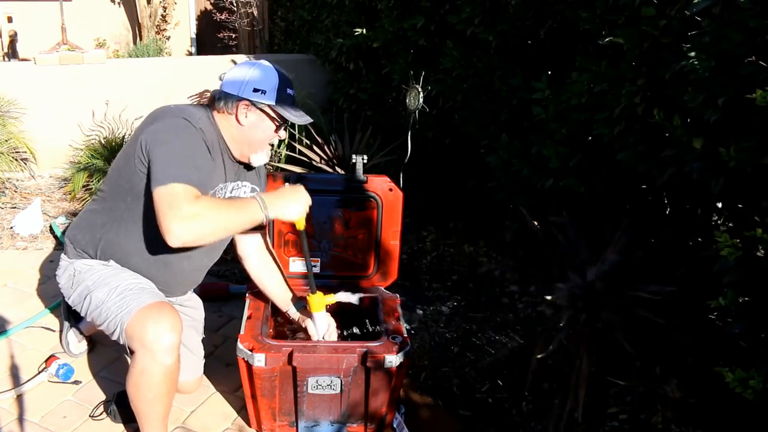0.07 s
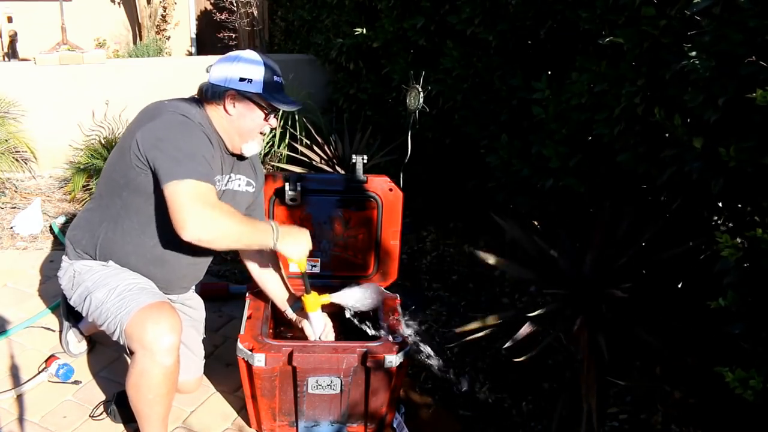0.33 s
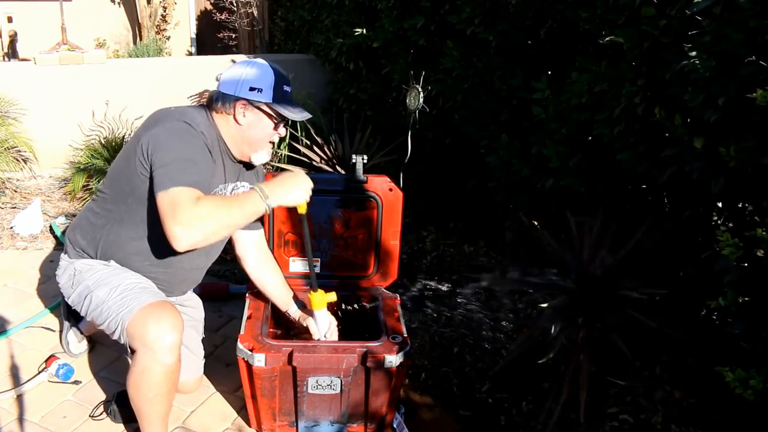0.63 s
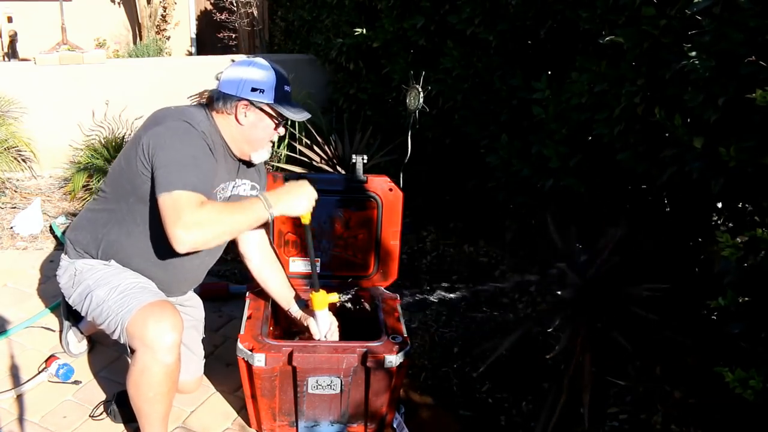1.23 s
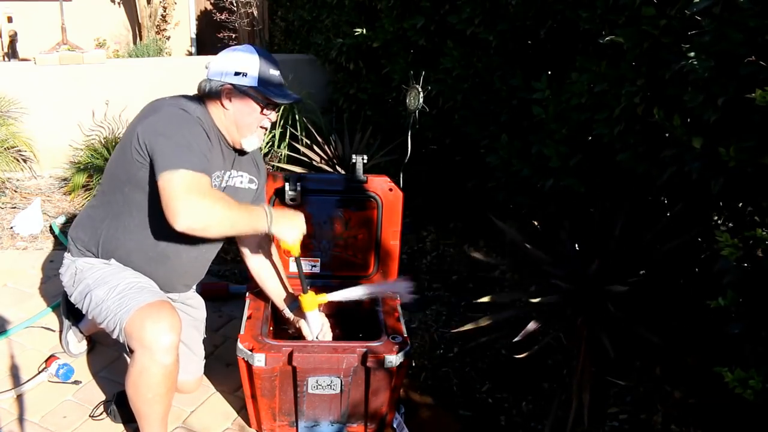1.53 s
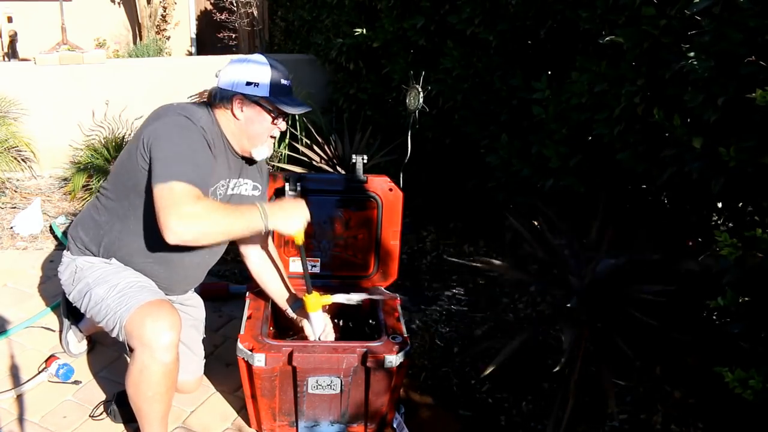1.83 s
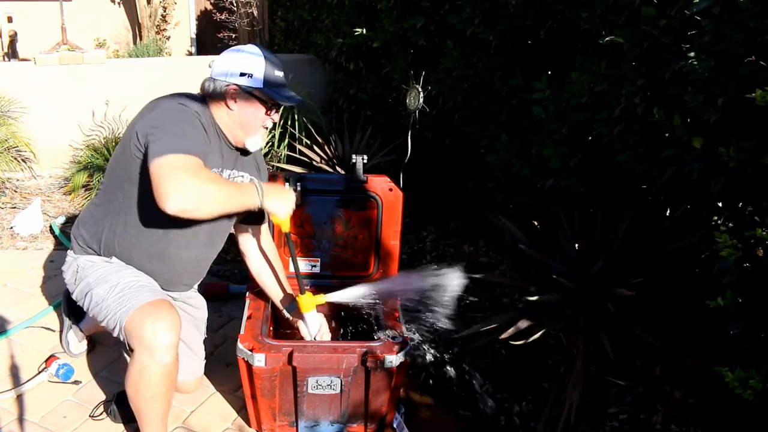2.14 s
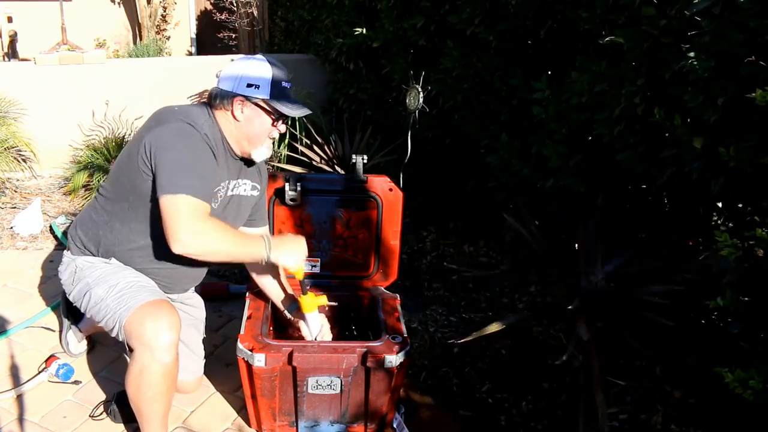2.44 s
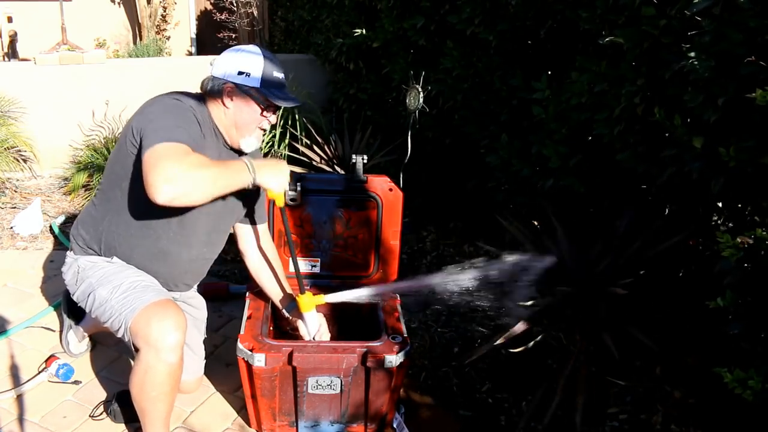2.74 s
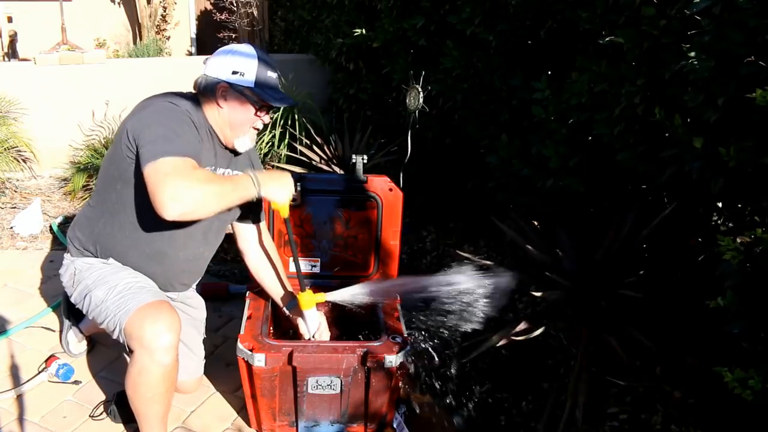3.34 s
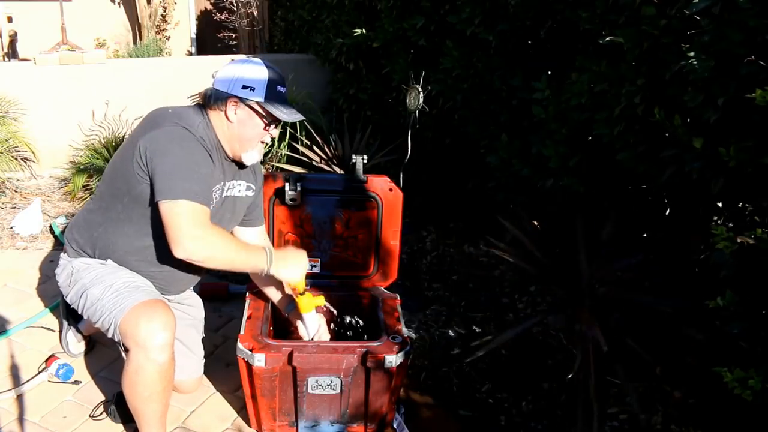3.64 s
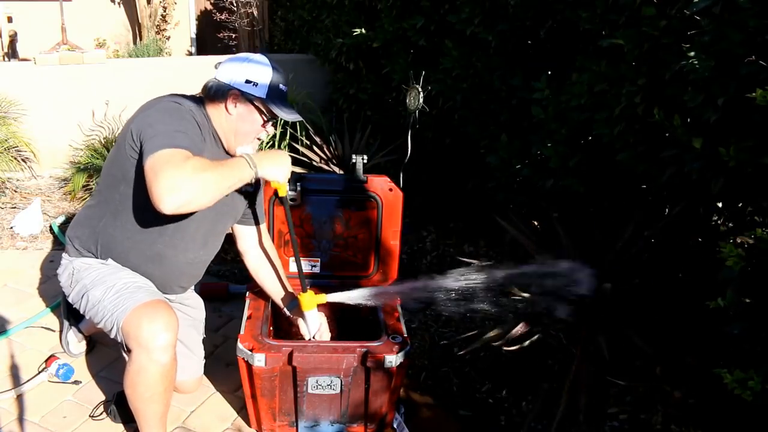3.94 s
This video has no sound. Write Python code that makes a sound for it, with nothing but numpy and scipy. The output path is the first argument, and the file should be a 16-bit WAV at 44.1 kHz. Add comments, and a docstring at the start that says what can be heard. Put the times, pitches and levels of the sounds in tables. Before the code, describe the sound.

In a yard, a hand water pump clacks about seven times in an even rhythm. Between the clacks come short squirts, gulps, dull knocks and drops spattering into bushes, with a constant background hiss.

```python
"""In a yard, a plastic hand bilge pump is worked in a cooler of water, about one stroke every 0.58 s.
At the bottom the piston's impact excites the modes of pump, rod, water column and cooler. On the pull
the valve chirps and a bubbling jet leaves the spout. At the top the barrel knocks, air pockets resonate
in gulps and glugs, and air sometimes spits out. Spray patters into the bushes over a steady hiss."""
import sys
import numpy as np
from scipy import signal
from scipy.fft import rfft, irfft
from scipy.io import wavfile
from scipy.ndimage import uniform_filter1d, map_coordinates

SR = 44100
rng = np.random.default_rng(int(sys.argv[2]) if len(sys.argv) > 2 else 0)


def wav_out(sig):
    """Save sig, one row per channel (or a flat mono array), as 16-bit PCM at SR to the path in sys.argv[1]."""
    wavfile.write(sys.argv[1], SR, np.round(np.clip(np.atleast_2d(sig).T, -1, 1) * 32767).astype(np.int16))


N = 176400


# Piston impacts: t/s, body level/dB, crack level/dB, ping f/Hz, water column level/dB, rod re body/dB
CLACKS = [(0.2881, -1.5, -0.5, 6100, -24, 0.5), (0.881, 3.5, 0.5, 5420, -22.5, 3.5),
          (1.4469, 6, 1, 5630, -18, 4), (2.024, 1.5, -3.5, 5630, -17.5, 0),
          (2.5723, 5.5, -0.5, 6160, -16.5, -7), (3.202, 1, -4.5, 5570, -17, -2),
          (3.75, 8, 1.5, 5370, -21, -3)]
# Modes of the pump with the piston down: f/Hz, level/dB, T60/s
PUMP_MODES = [(163.8, -38, 0.44), (356, -23, 0.15), (417, -18.5, 0.078), (501, -23, 0.13),
              (558, -18, 0.074), (695, -17, 0.11), (751, -9, 0.064), (860, -9, 0.042), (933, -20.5, 0.1),
              (1039, -16, 0.074)]
# Modes of the rod and handle: f/Hz, level/dB, T60/s
ROD_MODES = [(1355, -17, 0.056), (1577, -10, 0.027), (1724, -13.5, 0.061), (2270, -7, 0.012)]
# Spectrum of the plastic crack: f/Hz, level/dB
CRACK_SPECTRUM = [(100, -31.5), (700, 2.5), (1800, 4), (3800, -5.5), (5500, -1), (8000, 1), (11000, -13.5),
                  (16000, -23)]
COLUMN_HZ, COLUMN_T60_S = 252, 0.27

def piston_clacks():
    """Impact excitation: the piston bottoms out with a crack; pump, rod, water and cooler ring freely."""
    out, t = np.zeros(N), np.arange(SR // 3) / SR
    for s, body_db, crack_db, hz, column_db, rod_db in CLACKS:
        crack = amp(-4) * decay(t, t60=0.019, hold=0.0021) * noise(CRACK_SPECTRUM, len(t))
        ping = amp(-4.5) * decay(t, t60=0.021) * np.sin(2 * np.pi * hz * t)
        column = amp(column_db) * decay(t, COLUMN_T60_S) * np.sin(2 * np.pi * COLUMN_HZ * t)
        pump = ring(PUMP_MODES, t, scatter_db=1, detune=0.004)
        rod = amp(rod_db) * ring(ROD_MODES, t, scatter_db=1.5, detune=0.01)
        body = pump + rod + amp(-16) * cooler(t)
        add(out, s, column + amp(body_db) * body + amp(crack_db) * (crack + ping))
    return out


# Knocks at the top of the stroke: t/s, level/dB
KNOCKS = [(.003, -8), (0.04, -13.5), (0.602, -10), (0.618, -12.5), (1.26, -14.5), (1.759, -2.5),
          (1.798, -10), (2.324, -5), (2.357, -7), (2.881, -6.5), (2.918, -8)]
# Modes of the barrel with the piston up: f/Hz, level/dB, T60/s
BARREL_MODES = [(191.4, -25, 0.34), (368, -10.5, 0.06), (577, -17, 0.1), (743, -13.5, 0.048)]
# Spectrum of water in the pump, for slaps and gulps: f/Hz, level/dB
WET_SPECTRUM = [(60, -2), (200, -4), (450, -12), (800, -2), (1100, -5.5), (1600, -1.5), (2200, -8.5),
                (2900, -5), (4500, -21), (8000, -11.5), (16000, -37)]

def barrel_knocks():
    """Cushioned impact: water softens the piston's turn, so the barrel rings with a soft, wet onset."""
    out, t = np.zeros(N), np.arange(SR // 3) / SR
    for s, db in KNOCKS:
        slap = amp(-4.5) * decay(t, t60=0.021) * noise(WET_SPECTRUM, len(t))
        barrel = ring(BARREL_MODES, t, scatter_db=0, detune=0.015)
        add(out, s, amp(db) * onset(t, rise=0.004) * (barrel + slap + amp(-13) * cooler(t)))
    return out


# Response of the cooler to a blow: f/Hz, level/dB
COOLER_SPECTRUM = [(60, -14), (160, -2), (280, -4.5), (420, -1), (800, -2), (1200, -12), (3000, -35)]

def cooler(t):
    """Modal overlap: the hollow cooler's dense resonances merge into decaying noise."""
    return decay(t, t60=0.13) * noise(COOLER_SPECTRUM, len(t))


# One jet a pull: start t/s, end t/s, squirt level/dB, fizz level/dB, spout note level/dB
JETS = [(0.394, 0.559, -34, -29.5, -26.5), (0.98, 1.153, -25, -29.5, -27.5),
        (1.558, 1.743, -24, -29.5, -29), (2.112, 2.296, -30.5, -29, -33), (2.669, 2.859, -24.5, -31, -28),
        (3.308, 3.469, -26, -28.5, -27), (3.836, 4.014, -22.5, -30, -26.5)]
# Spectrum of the jet at mid-pull: f/Hz, level/dB
JET_SPECTRUM = [(80, -45), (200, -9.5), (350, 0.5), (560, -4), (760, -3.5), (900, -3), (1080, 1.5),
                (1250, 1.5), (1600, 4), (2200, 3.5), (2700, -3), (3200, -1), (4200, -41), (16000, -50)]
# Resonances of the water column above the piston at mid-pull: f/Hz, level/dB
COLUMN_SPECTRUM = [(400, -51), (950, 1.5), (1250, -6), (1650, 0.5), (2100, -4.5), (6000, -48)]
# Spectrum of the fine bubbles at mid-pull: f/Hz, level/dB
FIZZ_SPECTRUM = [(100, -38), (1200, -13), (2400, -1), (3300, 5), (4700, 0), (6500, 1), (9000, -7.5),
                 (16000, -11)]
SPOUT_HZ, SPOUT_SKIRT_HZ = 765, 202

def jets():
    """Pipe resonance: a bubbling jet climbs in pitch as the column shortens; the spout holds one note."""
    flutter = amp(1.6 * wobble(70))
    jet = flutter * water(JET_SPECTRUM, (465, 3840), cycles=3.7, spread_db=0, noise_db=-1, count=6000)
    column = water(COLUMN_SPECTRUM, (850, 2200), cycles=5, spread_db=3, noise_db=-7, count=2500)
    column *= flutter
    fizz = water(FIZZ_SPECTRUM, (2170, 13900), cycles=8.2, spread_db=-5.5, noise_db=-5, count=7000)
    note = noise([(SPOUT_HZ / 2, -60), (SPOUT_HZ - SPOUT_SKIRT_HZ, -22), (SPOUT_HZ, 0),
                  (SPOUT_HZ + SPOUT_SKIRT_HZ, -22), (SPOUT_HZ * 2, -60)])
    out = np.zeros(N)
    for start, end, db, fizz_db, note_db in JETS:
        middle = (start + end) / 2
        squirt = amp(2.5) * glide(jet, middle, octaves_per_s=1.4, reach=0.07)
        squirt += amp(-1.5) * glide(column, middle, octaves_per_s=7, reach=0.06)
        rising_fizz = glide(fizz, middle, octaves_per_s=5, reach=0.07)
        out += amp(db) * swell(start, end, rise=0.052, t60=0.1) * squirt
        out += amp(fizz_db) * swell(start, end, rise=0.06, t60=0.26) * rising_fizz
        out += amp(note_db) * swell(start, end - 0.045, rise=0.052, t60=0.1) * note
    return out


# Escapes of air: t/s, duration/s, level/dB, rise time/s
SPITS = [(2.439, 0.031, -2, 0.0054), (3.491, 0.051, -6, 0.035)]
# Spectrum of a spit: f/Hz, level/dB
SPIT_SPECTRUM = [(40, -12), (170, -7), (300, -11), (900, -10.5), (2000, -10.5), (4500, -13), (6500, -16.5),
                 (9500, -17.5), (16000, -21.5)]
SPIT_HOLD_SHARE, SPIT_FADE_DB = 0.42, 12

def air_spits():
    """Turbulent flow: air bursts out as the jet runs dry, and fades until the valve cuts it off."""
    spit = water(SPIT_SPECTRUM, (520, 12400), cycles=0.38, spread_db=2.5, noise_db=-3, count=8000)
    out = np.zeros(N)
    for s, length, db, rise in SPITS:
        progress = (clock() - s) / length
        fade = np.clip((progress - SPIT_HOLD_SHARE) / (1 - SPIT_HOLD_SHARE), 0, 1)
        out += amp(db - SPIT_FADE_DB * fade) * swell(s, s + length, rise, t60=0.018) * spit
    return out


# Valve openings: t/s, duration/s, level/dB, mid-chirp f/Hz
CHIRPS = [(.971, 0.0087, -16.5, 3120), (1.544, 0.013, -19, 3084), (2.286, 0.0039, -23, 4930),
          (2.674, 0.011, -16.5, 2900), (3.845, 0.013, -15, 2760)]
# Spectrum of the wet rasp: ratio to the chirp's f, level/dB
RASP_SPECTRUM = [(.15, -4.5), (.55, 0), (1, -1), (1.5, -13), (1.8, -26), (3.5, -40)]
CHIRP_OCTAVES_PER_S = 11

def valve_chirps():
    """Flow-induced vibration: the rubber valve opens with a rising squeak; an overtone joins late."""
    out, t = np.zeros(N), np.arange(SR // 10) / SR
    for s, length, db, hz in CHIRPS:
        pitch = hz * 2 ** (CHIRP_OCTAVES_PER_S * (np.minimum(t, 2 * length) - length / 2))
        phase = 2 * np.pi * np.cumsum(pitch) / SR + 0.8 * wobble(550)[:len(t)]
        squeak = np.sin(phase) + 0.6 * onset(t, length) ** 2 * np.sin(1.42 * phase)
        rasp = 0.6 * noise([(ratio * hz, level) for ratio, level in RASP_SPECTRUM], len(t))
        envelope = onset(t, rise=0.001) * decay(t, t60=0.016, hold=length)
        add(out, s, amp(db) * envelope * (squeak + rasp))
    return out


# Gulps in the spout: t/s, duration/s, level/dB, air pocket f/Hz
GULPS = [(0.037, 0.0032, -20, 774), (0.679, 0.015, -21, 1320), (0.694, 0.012, -21, 3240),
         (1.268, 0.026, -20, 1730), (1.5, 0.007, -40, 660), (1.794, 0.014, -17.5, 750),
         (2.394, 0.034, -16, 1700), (2.667, 0.0044, -18, 850), (2.976, 0.0032, -14.5, 2530),
         (3.574, 0.03, -24, 1590)]

def gulps():
    """Resonant filtering: a pocket of air lifts the bubbling of passing water near its own frequency."""
    bubbles = water(WET_SPECTRUM, (405, 5130), cycles=6, spread_db=1.5, noise_db=6.5, count=8000)
    out, t = np.zeros(N), np.arange(SR // 8) / SR
    for s, length, db, hz in GULPS:
        pocket_peak = [(hz / 1.38, 0), (hz, 9), (hz * 1.15, 0)]
        gulp = colour(bubbles[round(s * SR):][:len(t)], pocket_peak)
        add(out, s, amp(db) * onset(t, rise=0.0014) * decay(t, t60=0.076, hold=length) * gulp)
    return out


# Large air pockets in the barrel: t/s, level/dB, f/Hz
GLUGS = [(0.626, -19.5, 248), (1.767, -17.5, 392), (2.327, -25, 385), (2.887, -15, 406.6)]

def glugs():
    """Bubble resonance: trapped air is a spring and water its mass, giving one damped, hollow note."""
    out, t = np.zeros(N), np.arange(SR // 4) / SR
    for s, db, hz in GLUGS:
        add(out, s, amp(db) * onset(t, rise=0.0049) * decay(t, t60=0.2) * np.sin(2 * np.pi * hz * t))
    return out


# Showers landing in the bushes: start t/s, end t/s, level/dB
SHOWERS = [(-.06, 0.125, -28.5), (0.545, 0.762, -29), (1.143, 1.304, -30), (1.712, 1.908, -29),
           (2.293, 2.338, -22.5), (2.825, 3.067, -29.5), (3.584, 3.634, -27.5)]
# Spectrum of the fine drops: f/Hz, level/dB
SPRAY_SPECTRUM = [(80, -12), (280, -4.5), (500, -16), (850, 1), (1100, -5.5), (1700, 1.5), (2700, -3.5),
                  (4600, -7), (6200, -3.5), (8300, 1.5), (10000, 1), (12500, -7.5), (16000, -11)]
# Single splats on leaves: t/s, level/dB
SPLATS = [(.123, -26), (.652, -21), (1.238, -16), (1.771, -18), (1.918, -31), (2.527, -26), (2.935, -20),
          (3.043, -20), (3.168, -36), (3.371, -25.5)]
# Spectrum of the ticks and splats: f/Hz, level/dB
SPLAT_SPECTRUM = [(200, -36), (3000, -9), (6500, 0.5), (8500, 10), (11000, 1), (16000, -27)]
TICKS_PER_S, TICK_T60_S = 45, 0.008

def spray():
    """Shot noise: random impacts of fine drops on leaves merge into patter; big ones tick and splat."""
    clumps = amp(1.8 * wobble(60))
    drops = water(SPRAY_SPECTRUM, (874, 13300), cycles=0.41, spread_db=5, noise_db=4, count=11000)
    hits = (rng.random(N) < TICKS_PER_S / SR) * rng.uniform(0.3, 1, N)
    ticks = amp(12) * signal.lfilter([1], [1, -decay(1 / SR, TICK_T60_S)], hits)
    shower = sum(amp(db) * swell(start, end, rise=0.052, t60=0.61) for start, end, db in SHOWERS)
    splats = sum(amp(db) * swell(s, s + 0.0015, rise=0.0011, t60=0.036) for s, db in SPLATS)
    return shower * clumps * drops + (shower * ticks + splats) * noise(SPLAT_SPECTRUM)


# Spectrum of the outdoor background: f/Hz, level/dB
YARD_SPECTRUM = [(20, -4), (60, 4.5), (130, 0), (300, 9), (450, 4.5), (800, 3), (1300, 4), (2500, 1),
                 (5000, -5), (8500, 2.5), (12000, -5), (16000, -8.5)]

def yard():
    """Ambient noise: a broadband hiss whose level drifts a little."""
    return amp(-34.5 + 1.1 * wobble(6)) * noise(YARD_SPECTRUM)


def ring(modes, t, scatter_db, detune):
    """Modal superposition: damped sines whose levels and frequencies vary from blow to blow."""
    hz, db, t60 = np.transpose(modes)[:, :, None]
    level, shift = rng.standard_normal((2, len(modes), 1))
    sign = (-1) ** np.arange(len(modes))[:, None]
    tones = np.sin(2 * np.pi * hz * (1 + detune * shift) * t)
    return np.sum(sign * amp(db + scatter_db * level) * decay(t, t60) * tones, 0)


def water(spectrum, band_hz, cycles, spread_db, noise_db, count):
    """Incoherent sum: bubbles or drops, each falling to 1/e in `cycles` periods, over noise; rms 1."""
    when, pitch, size, sign = rng.random((count, 4)).T[:, :, None]
    low, high = band_hz
    hz = low * (high / low) ** pitch
    age = np.arange(320)  # samples
    turns = hz * age / SR
    strength = amp(-spread_db * np.log(1 - 0.985 * size)) * hz / high
    grains = np.sign(sign - 0.5) * strength * np.sin(2 * np.pi * turns) * np.exp(-turns / cycles)
    positions = (when * N).astype(int) + age
    cloud = np.bincount(positions.ravel(), grains.ravel(), minlength=N)[:N]
    return unit(colour(cloud, spectrum) + amp(noise_db) * noise(spectrum))


def glide(x, centre, octaves_per_s, reach):
    """Time scaling: all frequencies of x slide upward within `reach` seconds of the centre."""
    speed = 2 ** (octaves_per_s * np.clip(clock() - centre, -reach, reach))
    return np.interp(np.cumsum(speed) % N, np.arange(N), x)


def colour(x, spectrum):
    """Spectral shaping by (f/Hz, level/dB) points, at rms 1."""
    f, db = np.transpose(spectrum)
    hz = np.fft.rfftfreq(len(x), 1 / SR)
    gain = amp(np.interp(np.log(hz + 1), np.log(f), db))
    return unit(irfft(rfft(x) * gain, len(x)))


def noise(spectrum, samples=N):
    """Filtered white noise, at rms 1."""
    return colour(rng.standard_normal(samples), spectrum)


def wobble(rate):
    """Smooth random modulation, `rate` knots a second."""
    return map_coordinates(rng.standard_normal(2048), [clock() * rate], mode="wrap")


def onset(t, rise):
    """Linear growth from 0 to 1 in `rise` seconds."""
    return np.clip(t / rise, 0, 1)


def decay(t, t60, hold=0):
    """Exponential decay after `hold` seconds, by 60 dB every t60 seconds."""
    return amp(-60 * np.maximum(t - hold, 0) / t60)


def swell(start, end, rise, t60):
    """Envelope of a driven sound: rise, hold until the end, decay."""
    return onset(clock() - start, rise) * decay(clock(), t60, hold=end)


def amp(db):
    """Level to amplitude ratio."""
    return 10 ** (np.asarray(db) / 20)


def unit(x):
    """Normalisation to rms 1."""
    return x / np.sqrt(np.mean(x ** 2) + 1e-20)


def clock():
    """t/s of every sample."""
    return np.arange(N) / SR


def add(out, s, sound):
    """Superpose a sound from time s on."""
    i = max(0, round(s * SR))
    out[i:i + len(sound)] += sound[:max(0, N - i)]


def scene():
    """Linear superposition: pump, water and yard sum at one microphone."""
    pump = piston_clacks() + barrel_knocks() + glugs() + jets() + valve_chirps() + gulps() + air_spits()
    return (pump + spray() + yard())[None]


THRESHOLD_DB, RECOVER_DB_PER_S, TOP_HZ = 1.5, 47, 16000

def record(dry):
    """Peak limiting: loud peaks duck the gain, which recovers slowly; soft clip and low-pass follow."""
    over_db = np.maximum(20 * np.log10(np.abs(dry[0]) + 1e-9) - THRESHOLD_DB, 0)
    recovery = RECOVER_DB_PER_S * clock()
    duck_db = uniform_filter1d(np.maximum.accumulate(over_db + recovery) - recovery, size=64)
    ducked = dry * amp(-duck_db)
    rounded = ducked / (1 + np.abs(ducked) ** 8) ** (1 / 8)
    return irfft(rfft(rounded) * (np.fft.rfftfreq(N, 1 / SR) < TOP_HZ), N)


dry = scene()
out = record(dry)
wav_out(out)
```